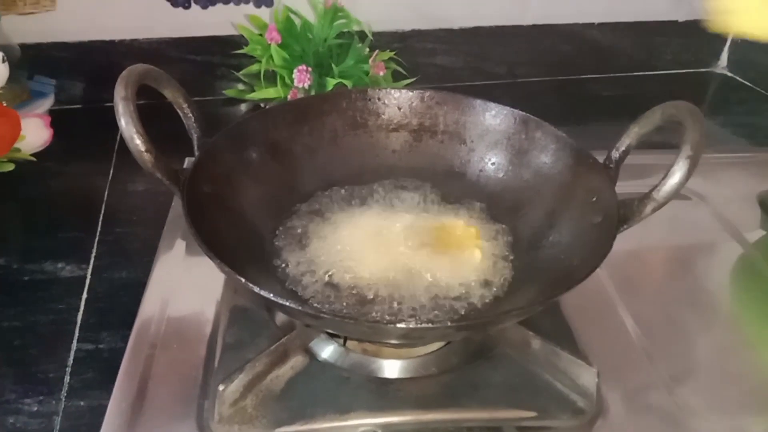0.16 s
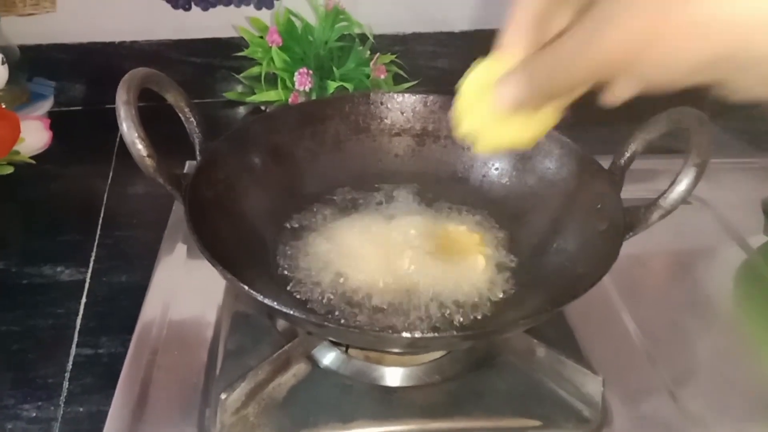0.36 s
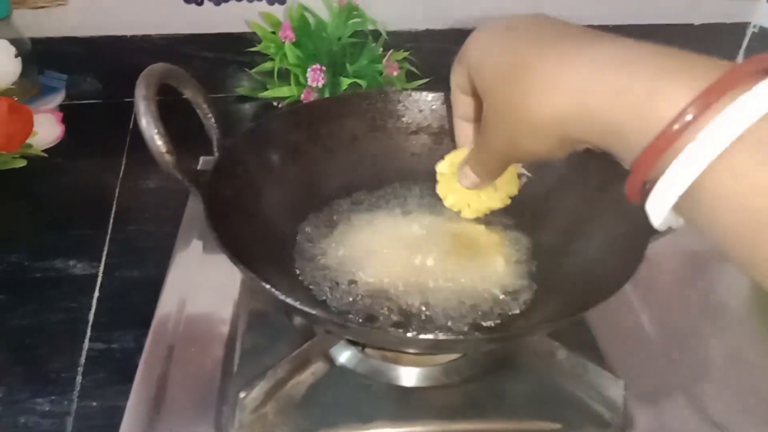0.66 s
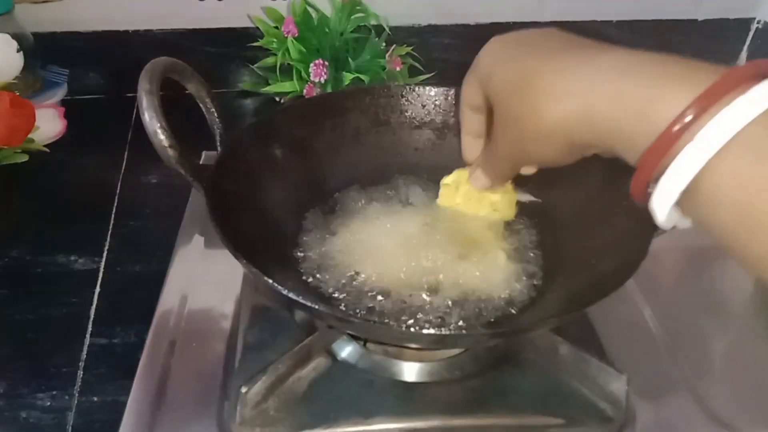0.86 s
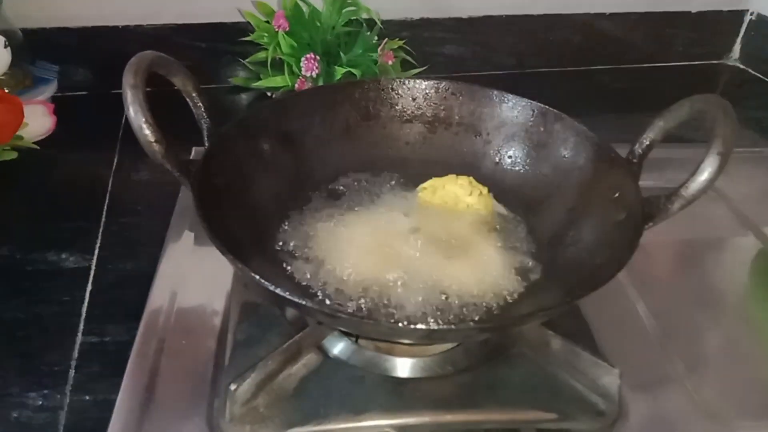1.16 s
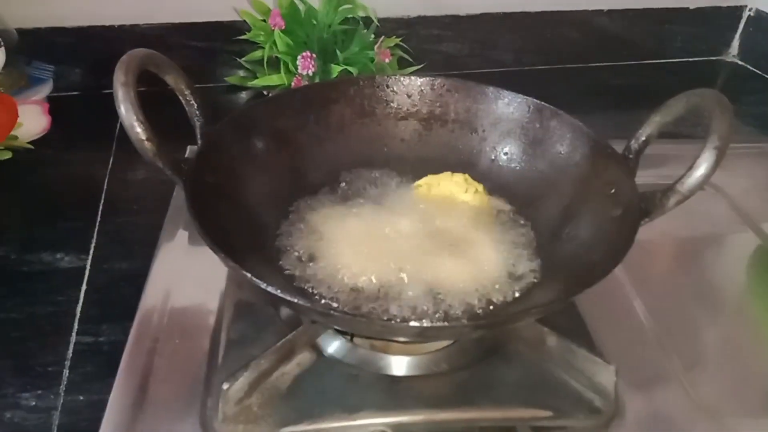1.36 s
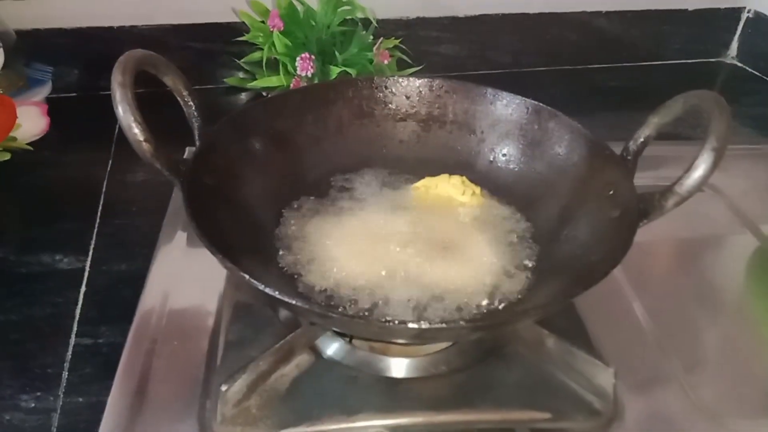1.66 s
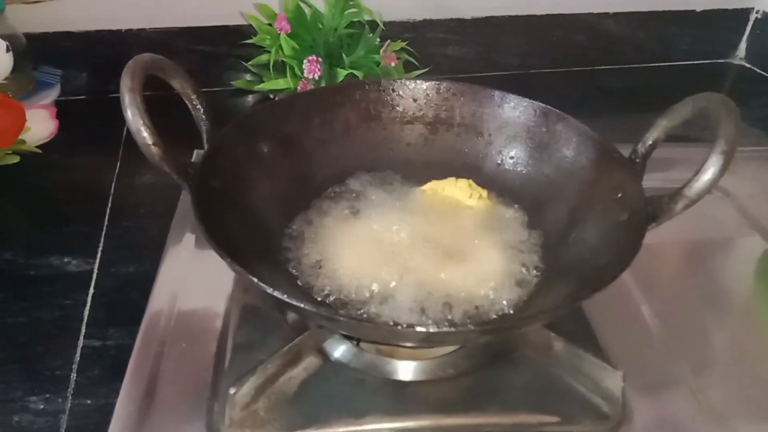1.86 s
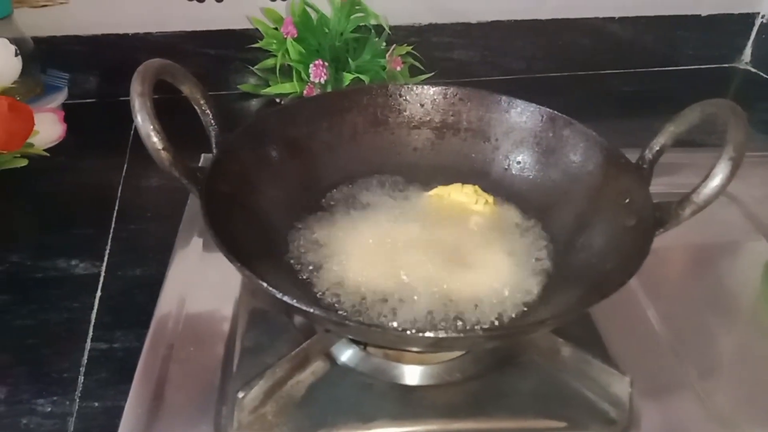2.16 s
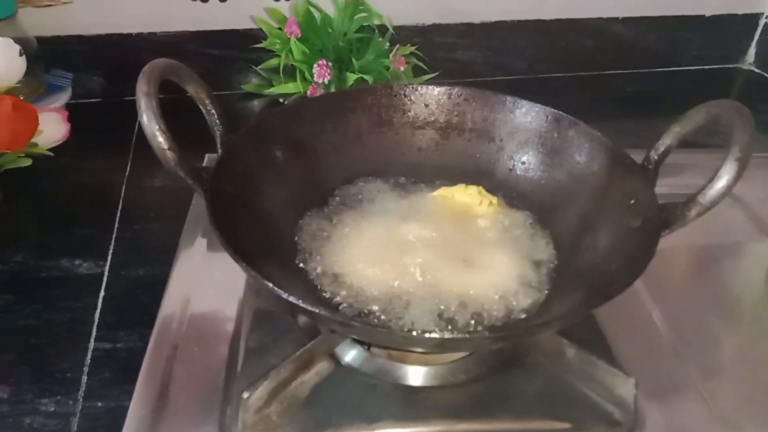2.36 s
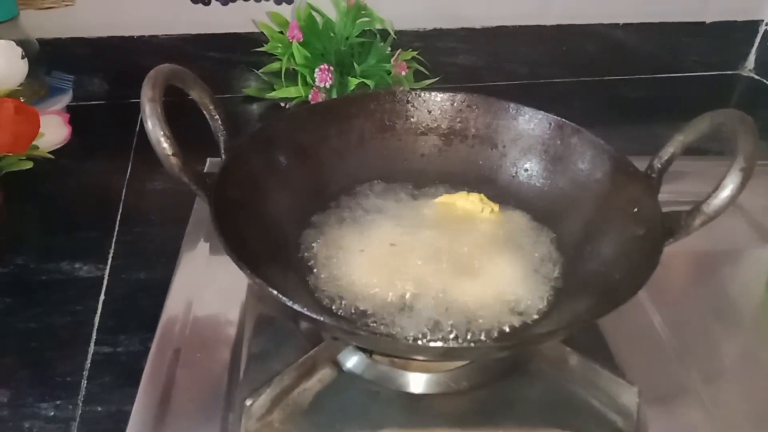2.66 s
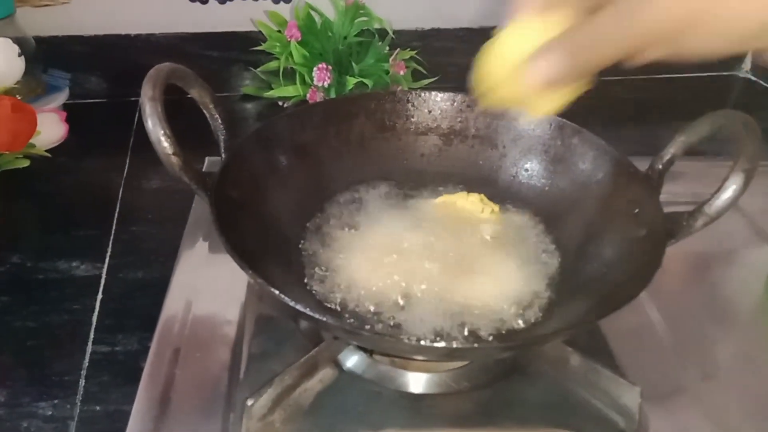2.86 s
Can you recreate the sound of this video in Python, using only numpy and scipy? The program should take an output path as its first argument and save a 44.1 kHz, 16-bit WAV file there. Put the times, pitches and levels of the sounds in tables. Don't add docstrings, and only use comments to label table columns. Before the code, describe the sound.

A steady frying sizzle fills the whole stretch, bubbling and slightly ringing through the metal pan, with irregular loud oil pops, thin spits and soft gurgling; close phone microphone, short hard kitchen reflections.

```python
import sys
import numpy as np
from scipy import signal
from scipy.fft import rfft, irfft
from scipy.io import wavfile

SR = 44100
rng = np.random.default_rng(int(sys.argv[2]) if len(sys.argv) > 2 else 0)


def voltage_ratio(decibels):
    exponent = np.asarray(decibels, float) / 20
    return 10 ** exponent


def transcribe(signal):
    frames = np.atleast_2d(signal).T
    limited = np.clip(frames, -1, 1)
    pcm = np.round(limited * 32767).astype(np.int16)
    wavfile.write(sys.argv[1], SR, pcm)


N = 132300


def rms_one(x):
    return x / np.sqrt(np.mean(x ** 2) + 1e-20)


def drift(rate_hz):
    pole = np.exp(-80 * np.pi * rate_hz / SR)
    noise = rng.standard_normal(N // 40 + 2002)
    slow = signal.lfilter([1], [1, -2 * pole, pole * pole], noise)[2000:]
    return np.interp(np.arange(N) / 40, np.arange(len(slow)), rms_one(slow))


def resonance(x, hz, width_hz):
    r = np.exp(-np.pi * width_hz / SR)
    poles = [1, -2 * r * np.cos(2 * np.pi * hz / SR), r * r]
    return signal.lfilter([(1 - r * r) / 2, 0, (r * r - 1) / 2], poles, x + 1e-18)


def clicks(per_s, spread_db):
    size_db = spread_db * np.minimum(rng.exponential(1, N), 3.6)
    sizes = voltage_ratio(size_db) * rng.choice([-1, 1], N)
    return sizes * (rng.random(N) < per_s / SR)


# (time [s], level [dB], share sounding through the pan [0-1])
FRYING_VIGOUR = [(0, -34, 0.2), (.15, -31, 0.65), (.45, -32.5, 0.93), (.68, -31.5, 0.3), (.78, -30, 0),
                 (1.15, -30, 0.48), (1.45, -31, 0.26), (1.65, -31, 0.6), (1.85, -31, 0.4),
                 (2.2, -32.5, 0.55), (2.55, -32.5, 0), (2.66, -30.5, 1), (2.78, -33, 0.5), (3, -32.5, 0.25)]


def sizzle():
    time_s, level_db, pan_share = np.transpose(FRYING_VIGOUR)
    t = np.arange(N) / SR
    vigour_db = np.interp(t, time_s, level_db)
    through_pan = np.clip(np.interp(t, time_s, pan_share), 0, 1)
    clump_db = 0.9 * drift(30)
    bed = fizz(clump_db) + crackle(clump_db)
    heard = colour(through_pan * bed, 1.4) + colour((1 - through_pan) * bed, 0.4)
    return voltage_ratio(vigour_db) * rms_one(heard)


# (time [s], level [dB])
LARGE_BUBBLE_CHURN = [(0.0, -42.5), (0.27, -55), (0.34, -42.5), (0.53, -51), (0.62, -46), (0.64, -50),
                      (0.77, -47.5), (1.07, -51), (1.15, -48.5), (1.75, -50), (1.79, -62.5), (2.14, -43.5),
                      (2.33, -50), (2.36, -46), (2.47, -55), (2.57, -48.5), (2.84, -54), (3.0, -40)]


def fizz(clump_db):
    pitches_hz = np.geomspace(250, 16000, num=24)
    size_class = rng.integers(0, 24, N)
    bursts = clicks(14000 * voltage_ratio(clump_db), 2)
    time_s, level_db = np.transpose(LARGE_BUBBLE_CHURN)
    churn_db = 1.1 * np.interp(np.arange(N) / SR, time_s, level_db - level_db.mean())
    large = np.exp(-(np.log2(pitches_hz / 520) / 0.6) ** 4)
    ring_cycles = 4.9
    total = np.zeros(N)
    for k, hz in enumerate(pitches_hz):
        patch_db = 2.5 * drift(6.2)
        ring = resonance(bursts * (size_class == k), hz, 1.98 * hz / ring_cycles)
        total += voltage_ratio(patch_db + churn_db * large[k]) * ring
    return rms_one(total)


def crackle(clump_db):
    snaps = clicks(3500 * voltage_ratio(2 * clump_db), 4.4)
    return voltage_ratio(-8.5) * rms_one(signal.lfilter([1, -0.92], [1], snaps))


# (time [s], peak [dB], bubble pitch [Hz], share of
# sharp crack [dB])
SURFACE_BURSTS = [(0.1104, -20, 2760, -1), (0.1932, -19, 4350, -14), (0.4435, -19, 3320, -12),
                  (0.5857, -19, 7150, -8), (0.6074, -11, 3320, -10), (0.7494, -12, 4520, -3),
                  (0.7632, -18, 3830, -14), (0.8589, -14, 8530, -1), (0.8736, -19, 7410, 2),
                  (0.9305, -17, 8140, 4), (0.9605, -10, 7920, 1), (0.9718, -16, 7920, -3),
                  (1.0194, -20, 4390, -5), (1.0483, -22, 5430, -5), (1.1183, -18, 6630, 1),
                  (1.1313, -18, 5860, -8), (1.2079, -19, 3140, -9), (1.5599, -14, 7000, -9),
                  (1.5806, -13, 8050, 2), (1.5919, -18, 6500, -2), (1.6255, -20, 3140, -8),
                  (1.6863, -20, 4390, -6), (1.7017, -17, 3270, -7), (1.8494, -20, 5380, -2),
                  (2.2193, -20, 7750, 7), (2.3824, -17, 7000, -1), (2.5219, -20, 5080, -8),
                  (2.6817, -16, 2800, 4), (2.8093, -19, 7280, -9), (2.9538, -19, 8440, 2),
                  (0.0311, -25, 3400, -7), (0.0375, -22, 2110, -5), (0.0584, -21, 2710, -11),
                (0.251, -21, 4480, 7), (0.3184, -22, 8010, 3), (0.3645, -22, 8230, 0),
                (0.3865, -22, 7410, -5), (0.4827, -22, 3230, -3), (0.5219, -23, 3140, -5),
                (0.535, -21, 7490, -3), (1.4141, -21, 4390, -5), (1.4885, -21, 8440, 3),
                (1.9036, -21, 3790, -6), (2.036, -21, 4050, -6), (2.0669, -21, 3060, -8),
                (2.1084, -21, 5210, -9), (2.3971, -22, 3140, 1), (2.4168, -21, 8350, 7),
                (2.4809, -22, 1510, -8), (2.5538, -22, 5080, -9), (2.6308, -21, 3490, -7),
                (2.6443, -21, 5080, -9), (2.6544, -20, 4050, -10), (2.8279, -20, 3190, -5),
                (2.8363, -20, 7490, -13), (2.844, -21, 6680, -11), (2.875, -22, 7970, -6),
                (2.8981, -22, 7450, -8), (2.9036, -22, 2410, -4), (2.9755, -22, 2200, 3),
                  (0.0914, -24, 12500, 9), (0.1865, -24, 12500, 9), (0.6743, -23, 12500, 9),
                (0.7335, -25, 14500, 9), (1.4995, -27, 12500, 9), (1.562, -28, 12000, 9),
                (2.3621, -27, 12500, 9), (2.6172, -28, 12500, 9), (0.2084, -28, 10100, 6),
                (0.4216, -26, 8350, 5), (0.5823, -25, 8000, 0), (0.5861, -24, 3200, -9),
                (0.6081, -14, 5500, -9), (0.7202, -23, 7500, -4), (0.7602, -22, 4500, -6),
                (1.5613, -22, 8300, -4), (1.5708, -22, 7900, -5), (1.8238, -29, 10100, 6),
                (1.8692, -31, 12100, 8), (2.383, -18, 3300, -9), (2.3937, -24, 8000, 2),
                (2.4187, -24, 8100, 3), (2.4768, -31, 13100, 8), (2.5121, -28, 12100, 9),
                (2.642, -25, 7400, 4), (2.648, -22, 3500, -9), (2.878, -26, 9800, 7),
                (2.9018, -30, 10800, 7)]


def pops():
    crack_s, spray_s = 0.0003, 0.007
    out, t = np.zeros(N + SR), np.arange(2000) / SR
    rows = SURFACE_BURSTS
    noises = rng.standard_normal((len(rows), len(t)))
    for (start_s, peak_db, hz, crack_db), noise in zip(rows, noises):
        lift_db = 2.5 + 7 * min(hz / 8000, 1) ** 3
        cycles = 10 - 2.5 * min(crack_db + 6, 0)
        burst = np.sin(2 * np.pi * hz * t) * voltage_ratio(-60 * hz * t / cycles + lift_db)
        tear = noise * np.exp(-t / crack_s) * 0.45 + (t == 0)
        burst += voltage_ratio(crack_db + 3) * signal.lfilter([1, -1, -1, 1], [1], tear)
        burst[1] += voltage_ratio(4 + crack_db / 2)
        spray = rms_one(resonance(noise, hz, 0.31 * hz)) * np.exp(-t / spray_s)
        burst += voltage_ratio(-18 + lift_db / 2) * spray
        i = int((start_s + 0.0001) * SR)
        out[i:i + len(t)] += voltage_ratio(peak_db) * burst
    echo = np.roll(out, int(0.00046 * SR))
    return out[:N] - voltage_ratio(-13) * echo[:N]


# (start [s], length [s], level [dB], pitch [Hz])
STEAM_POCKETS = [(0.007, 0.1, -47.5, 369), (0.178, 0.17, -57, 346), (0.404, 0.024, -61.5, 354),
                 (0.72, 0.062, -54, 423), (1.137, 0.029, -58, 410), (1.19, 0.08, -53, 343),
                 (1.366, 0.29, -55, 360), (1.94, 0.12, -56.5, 324), (2.068, 0.11, -56.5, 330),
                 (2.309, 0.048, -57, 394), (2.648, 0.026, -55.5, 343),
                 (2.76, 0.041, -62, 235),
    (1.8, 0.14, -70, 280),
]


def gurgles():
    out, t, width_hz = np.zeros(N), np.arange(N) / SR, 72
    pockets = STEAM_POCKETS
    noises = rng.standard_normal((len(pockets), N))
    for (start_s, length_s, level_db, hz), noise in zip(pockets, noises):
        shape = np.sin(np.pi * np.clip((t - start_s + 0.017) / (length_s + 0.038), 0, 1))
        wobble = shape * resonance(resonance(noise, hz, width_hz), hz, 2 * width_hz)
        gain = np.sqrt(np.sum(shape ** 2) / np.sum(wobble ** 2))
        out += voltage_ratio(level_db - 0.1) * wobble * gain
    return out


# (frequency [Hz], width [Hz], lift [dB])
PAN_MODES = [(322, 83, 4.5), (548, 96, 1), (602.2, 10.6, 5.5), (763.4, 30, 6), (906, 59, -10),
             (1009, 20, 7.5), (1097, 153, 6), (1360, 23, 3), (1605, 58, 1), (2110, 29, 3), (2550, 87, -6),
             (3200, 120, 5), (6100, 830, -5.5)]
# (frequency
# [Hz], level [dB])
MIC_COLOUR = [(30, -23), (150, -29), (250, -27), (330, -22.5), (450, -18), (550, -5), (800, -2),
              (1000, -0.5), (2000, -0.5), (3200, 0), (4500, -1), (7000, 0.5), (8500, -1.5), (9000, -8),
           (9400, -20.5),
              (9750, -14.5), (11400, -19), (12300, -17.5), (13100, -17.5), (13850, -26), (14600, -21),
            (15480, -18), (15650, -36)]


def colour(x, pan_share):
    size = 16384
    hz = np.maximum(np.arange(size // 2 + 1) * SR / size, 1)
    curve_hz, curve_db = np.transpose(MIC_COLOUR)
    db = np.interp(np.log(hz), np.log(curve_hz), curve_db)
    for mode_hz, width_hz, lift_db in PAN_MODES:
        db = db + pan_share * lift_db / (1 + (2 * (hz - mode_hz) / width_hz) ** 2)
    cepstrum = irfft(np.log(voltage_ratio(db)))
    cepstrum[1:size // 2] *= 2
    cepstrum[size // 2 + 1:] = 0
    return signal.fftconvolve(x, irfft(np.exp(rfft(cepstrum))))[:N]


def kitchen(x):
    t60_s, first_echo_s = 0.22, 0.0015
    t = np.arange(SR // 2) / SR
    tail = rng.standard_normal(len(t)) * voltage_ratio(-60 * t / t60_s) * (t > first_echo_s)
    return voltage_ratio(-9) * signal.fftconvolve(x, tail / np.sqrt(np.sum(tail ** 2)))[:N]


def hum():
    level_db = -82 + 3.6 * drift(2.3)
    return voltage_ratio(level_db) * rms_one(resonance(rng.standard_normal(N), 97.5, 24))


def scene():
    hiss = sizzle()
    bursts = colour(pops(), 0.11)
    dull_hiss = signal.lfilter(*signal.butter(1, 4000, fs=SR), hiss)
    return (hiss + bursts + kitchen(dull_hiss + bursts) + gurgles() + hum())[None]


def low_pass(x):
    return signal.sosfilt(signal.butter(12, 15510, fs=SR, output="sos"), x)


def record(dry):
    return low_pass(dry)


dry = scene()
out = record(dry)
transcribe(out)
```